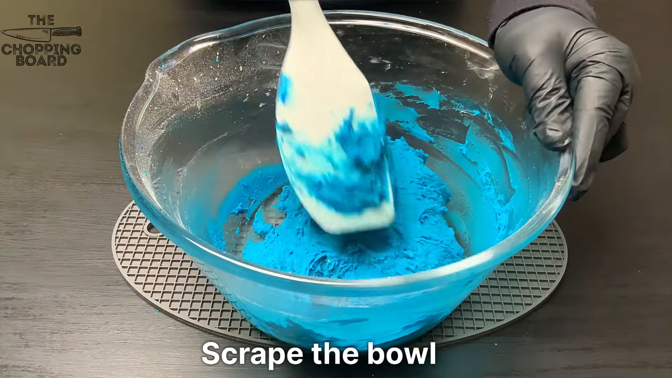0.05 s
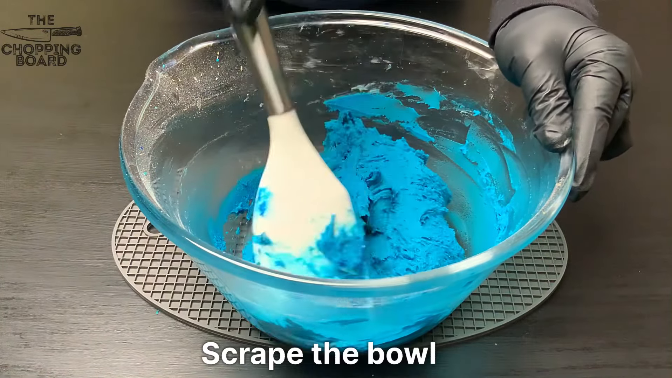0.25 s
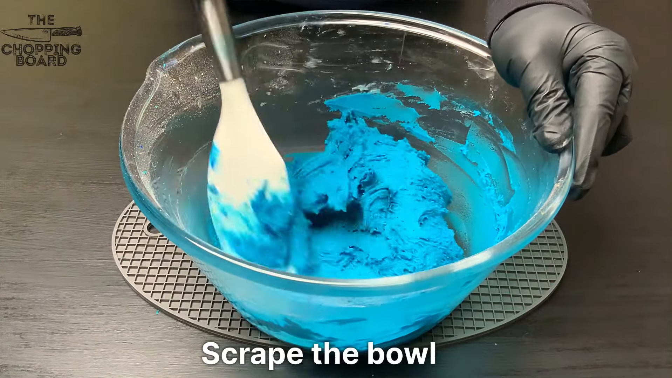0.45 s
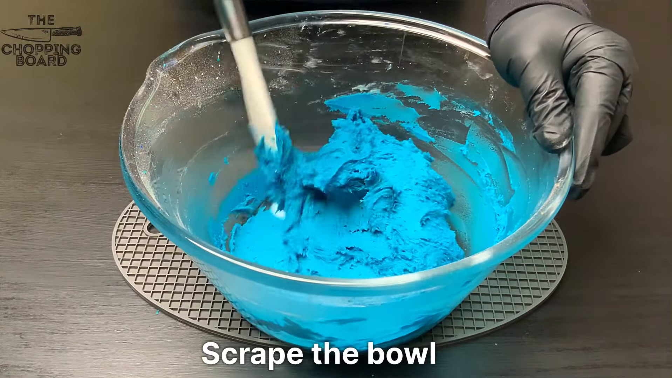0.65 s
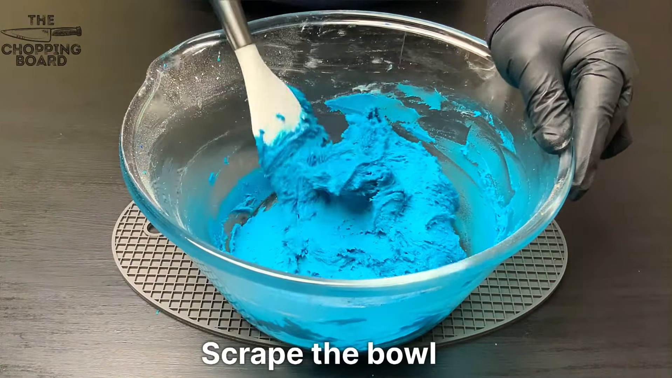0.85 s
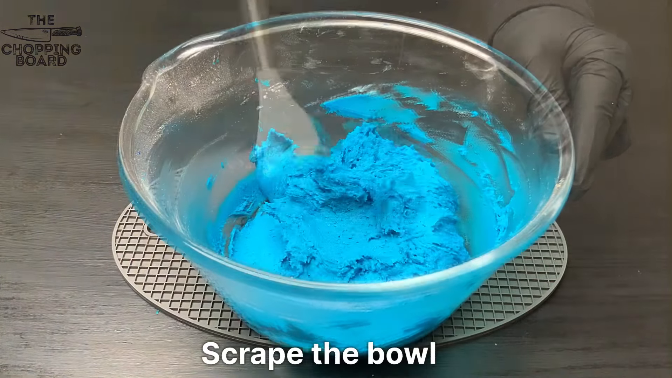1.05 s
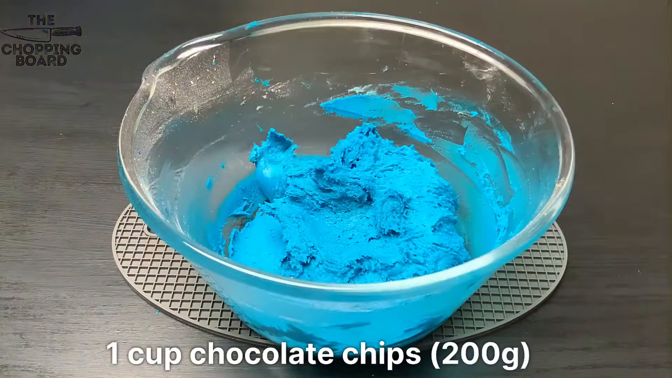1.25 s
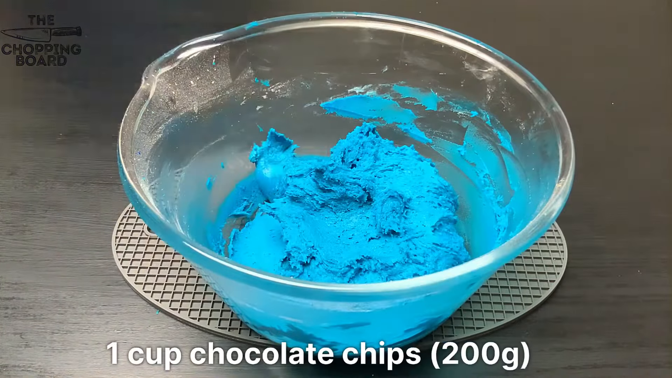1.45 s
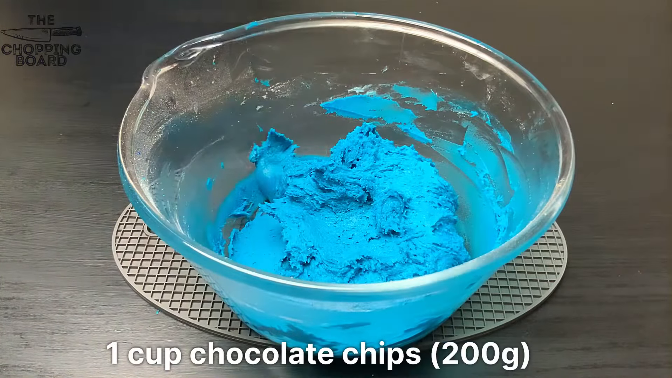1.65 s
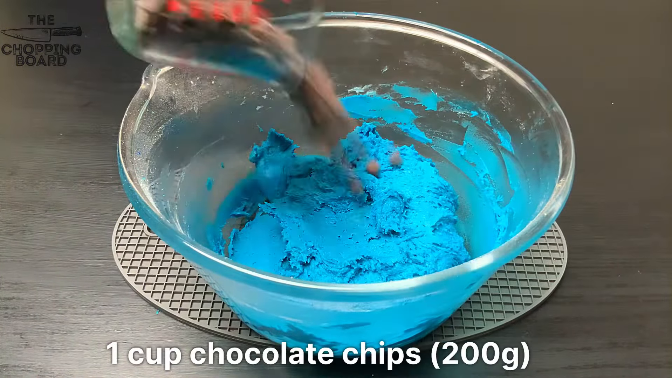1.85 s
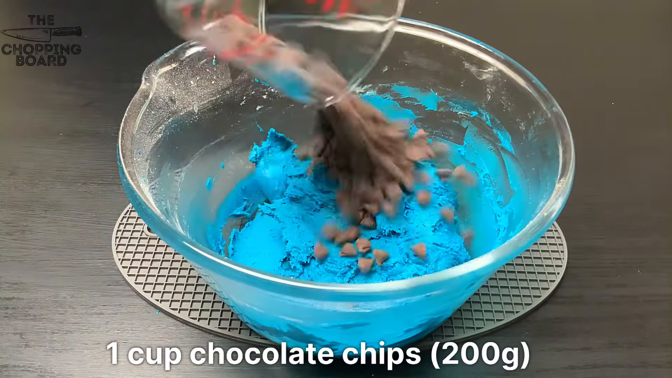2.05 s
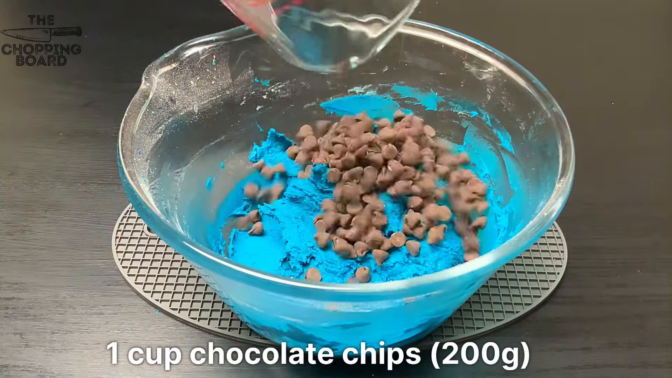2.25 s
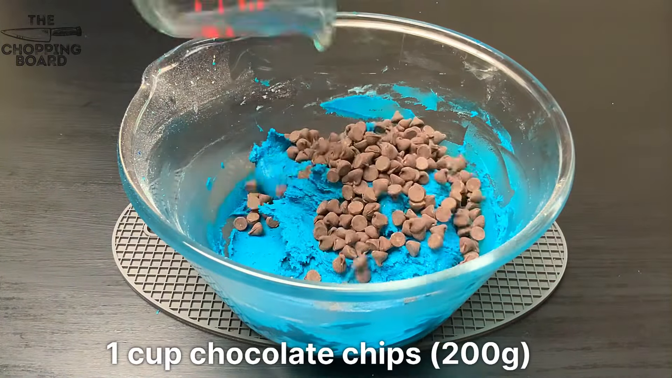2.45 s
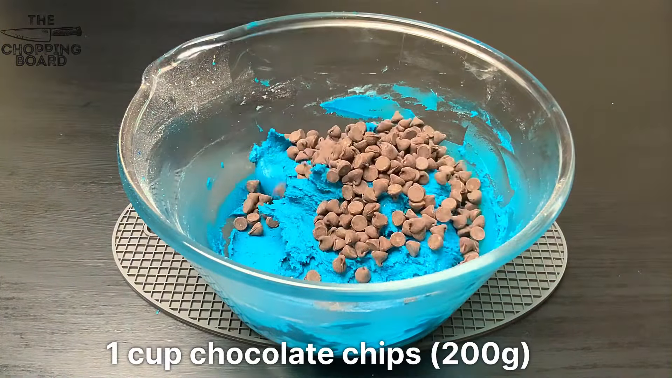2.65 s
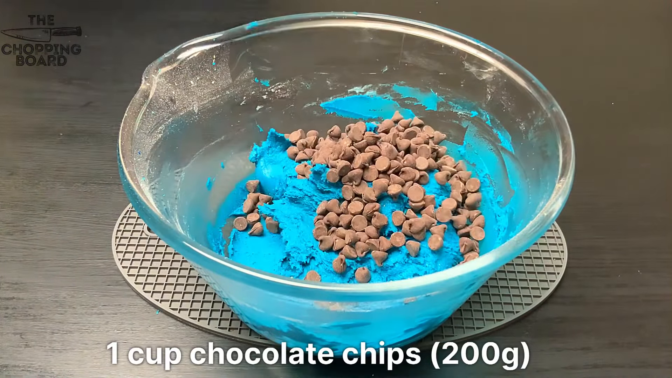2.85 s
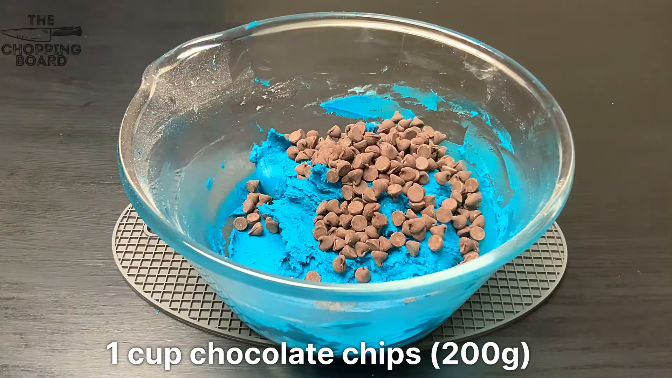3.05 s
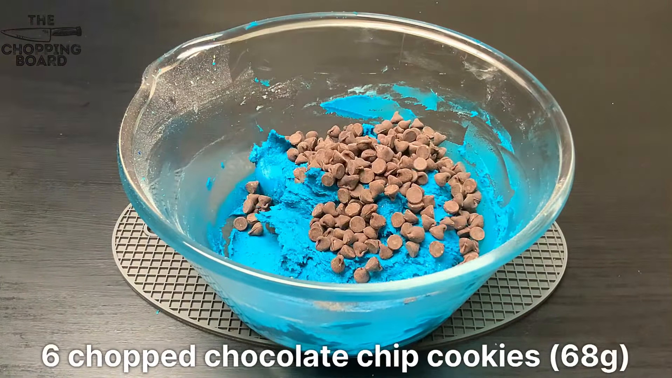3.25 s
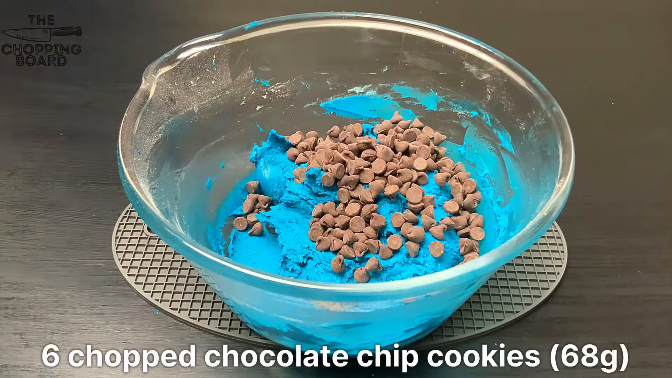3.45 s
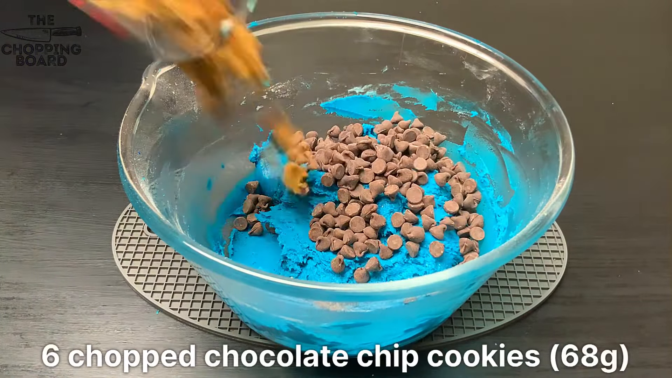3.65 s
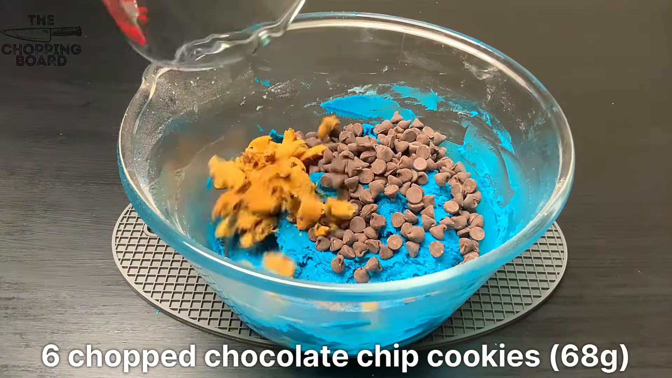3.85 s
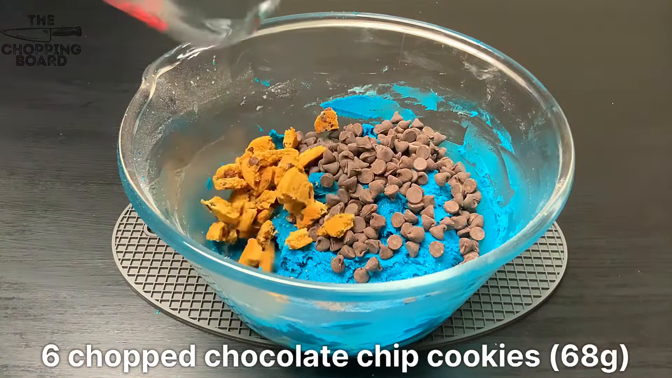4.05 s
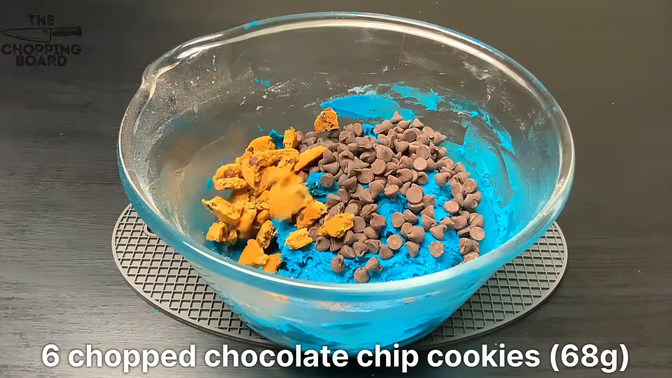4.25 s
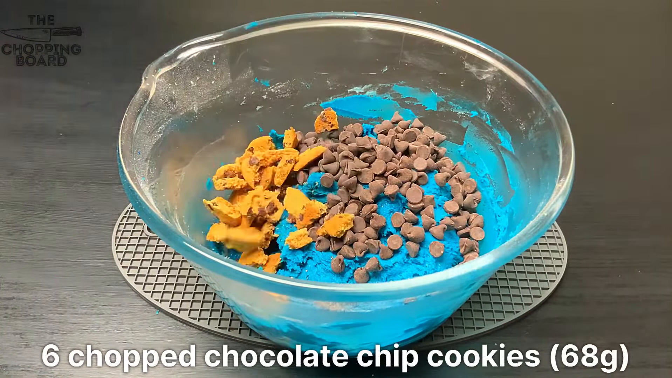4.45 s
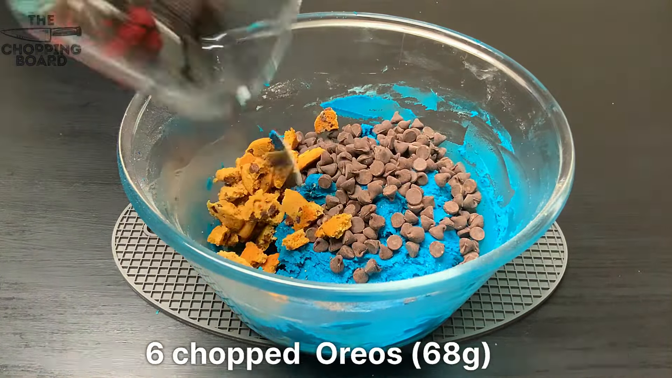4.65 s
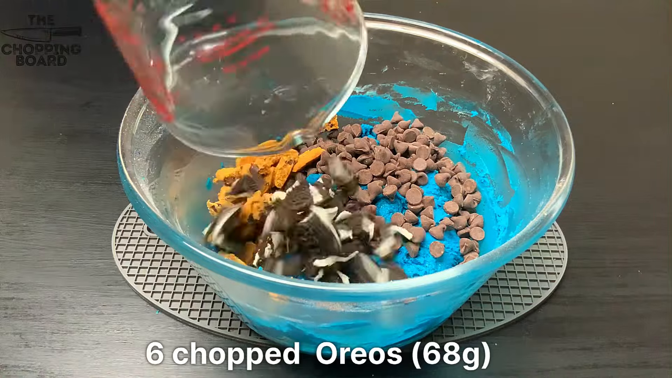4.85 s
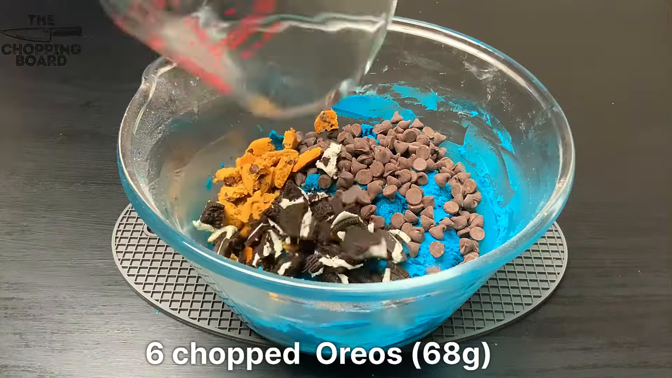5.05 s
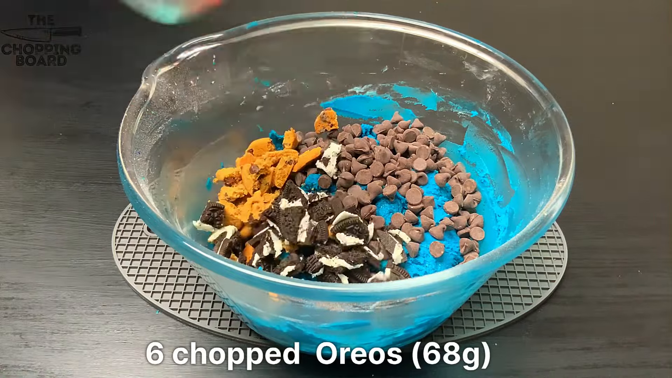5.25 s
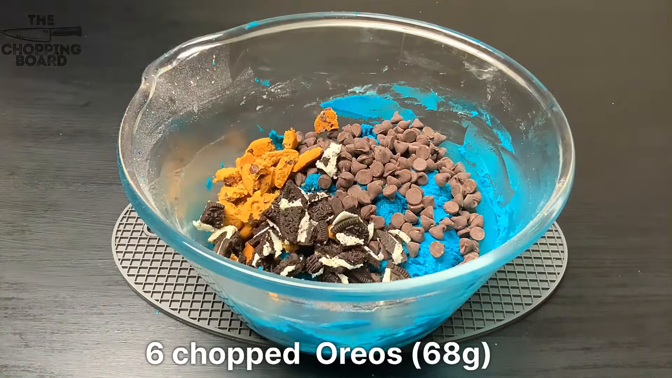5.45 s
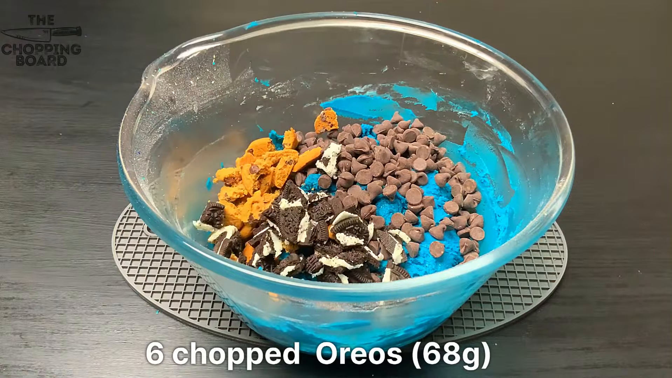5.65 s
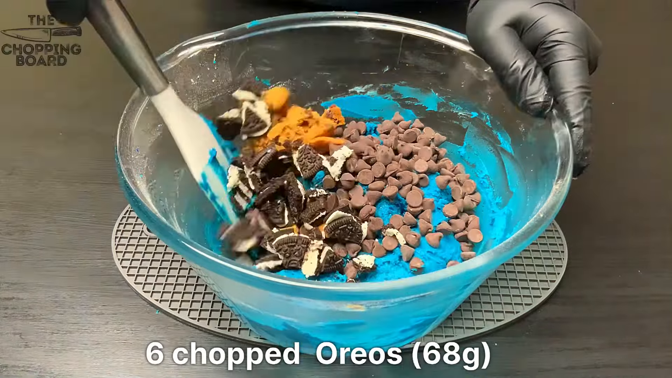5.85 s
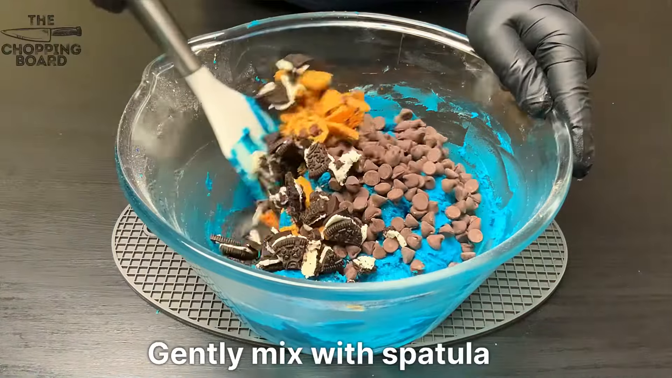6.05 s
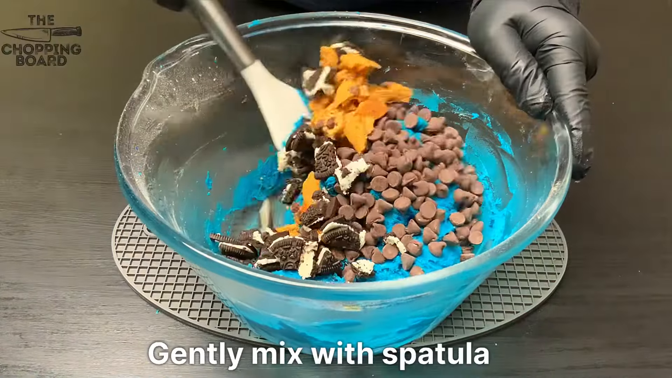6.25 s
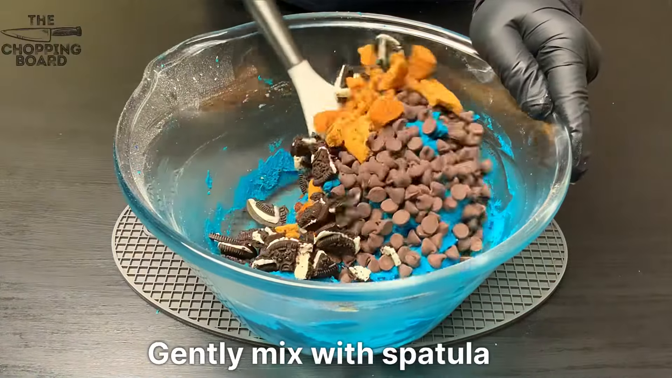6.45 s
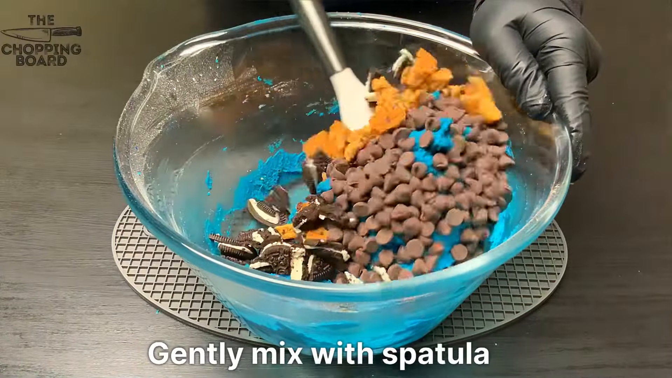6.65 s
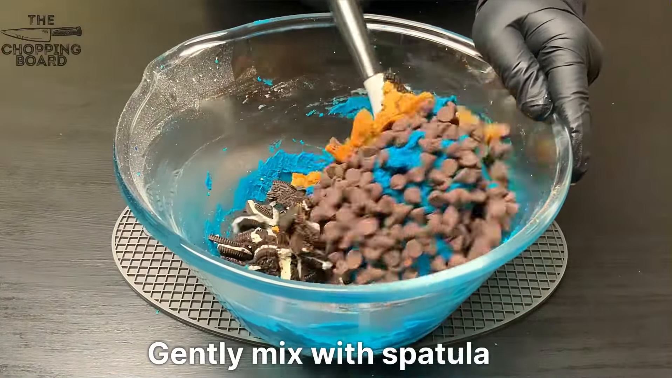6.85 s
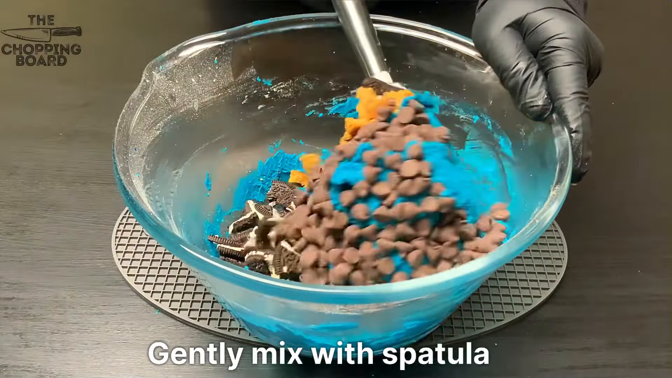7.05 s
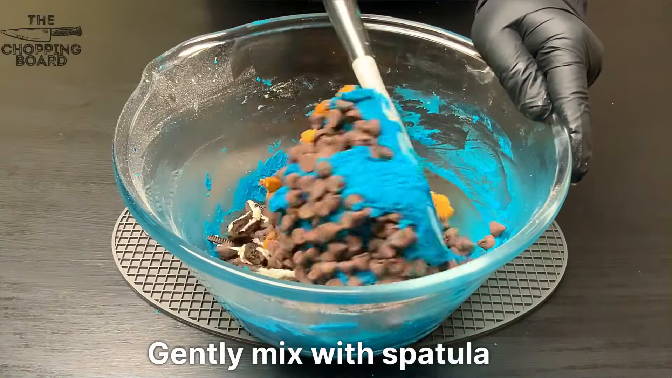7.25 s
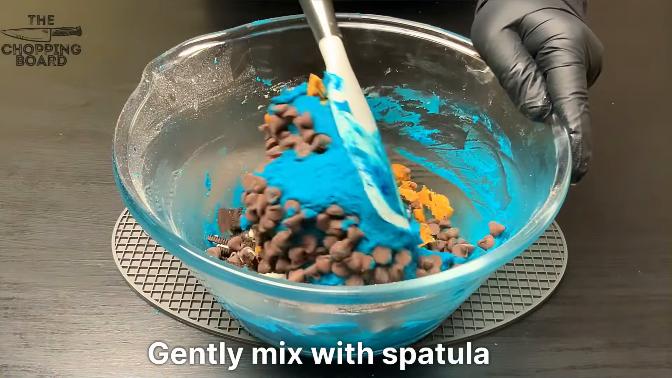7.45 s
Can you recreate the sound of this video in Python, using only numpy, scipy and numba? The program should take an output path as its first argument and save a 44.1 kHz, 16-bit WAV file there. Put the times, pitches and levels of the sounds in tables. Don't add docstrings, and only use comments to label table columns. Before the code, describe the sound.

In a quiet kitchen, a spatula faintly scrapes sticky dough in a glass bowl, clinks its steel handle on the rim and scrapes firmly before an abrupt cut. Chips tick in a glass jug and pour with a bright long rattle. Two short pours of cookie pieces follow, one thuddy, one sharper. Two more clinks, then crunchy, squelching folding. Close stereo microphones, slight room.

```python
import sys
import numpy as np
from scipy import signal
from scipy.fft import rfft, irfft, next_fast_len
from scipy.io import wavfile
from scipy.ndimage import uniform_filter1d
from numba import njit

SR = 44100
rng = np.random.default_rng(int(sys.argv[2]) if len(sys.argv) > 2 else 0)


def put_to_file(sound):
    columns = np.atleast_2d(sound).T
    safe = np.clip(columns, -1, 1)
    whole_steps = np.round(safe * 32767)
    wavfile.write(sys.argv[1], SR, whole_steps.astype(np.int16))


def how_loud(loudness_db):
    steps = np.asarray(loudness_db, float) / 20
    return 10 ** steps


N = 331191
TIME = np.arange(N) / SR
FAST = next_fast_len(N)
HZ = np.fft.rfftfreq(FAST, 1 / SR)
CUT_S = 1.194


def curve(tables, share_db=0., follows=0.92):
    out = np.full(N, -150.)
    for table, share in zip(tables, np.broadcast_to(share_db, len(tables))):
        s, value = np.transpose(table)
        level = share + follows * (np.interp(TIME, s, value) + 45) - 45
        out = np.where((TIME >= s[0]) & (TIME <= s[-1]), level, out)
    return out


def swells(s, db, rise_s, fall_s):
    coarse = TIME[::44]
    late = coarse[:, None] - s
    level = db - 30 * np.maximum(-late / rise_s, late / fall_s)
    return np.interp(TIME, coarse, np.max(level, axis=1))


def patches(rate, spread):
    hold = int(SR / rate)
    values = np.repeat(rng.standard_normal(N // hold + 1), hold)
    return spread * uniform_filter1d(values, hold // 2)[:N]


def shower(level_db, rate, spread_db):
    chance = rng.random((int(rate * N / SR), 2))
    s = chance[:, 0] * (N - 1) / SR
    db = level_db[(s * SR).astype(int)] - spread_db * np.log(chance[:, 1] + 0.02)
    audible = db > -125
    return s[audible], db[audible]


def colour(x, points, phase=0.):
    hz, db = np.transpose(points)
    gain = how_loud(np.interp(np.log(HZ + 1), np.log(hz), db))
    return irfft(rfft(x, FAST) * gain * np.exp(1j * phase), FAST)[:N]


def weigh(modes, points):
    hz, db = np.transpose(points)
    return [(f, mode_db + np.interp(np.log(f), np.log(hz), db), t60) for f, mode_db, t60 in modes]


def dry_body(lo_hz, hi_hz, cycles, count):
    return [(hz, -10 * np.log10(count), cycles / hz) for hz in np.geomspace(lo_hz, hi_hz, count)]


@njit
def add(out, place, size, r, w):
    a, b = 2 * r * np.cos(w), r * r
    i, e = 0, 0
    y1, y2, x1, x2 = 0., 0., 0., 0.
    while i < len(out):
        x = 0.
        while e < len(place) and place[e] <= i:
            x, e = x + size[e], e + 1
        y = .5 * (x - x2) + a * y1 - b * y2
        out[i] += y
        i, y1, y2, x1, x2 = i + 1, y, y1, x, x1
        if abs(y1) + abs(y2) + abs(x1) + abs(x2) < 1e-7:
            i = place[e] if e < len(place) else len(out)


def ring(modes, s, db, tilt_db=0., scatter_db=5.0, centre_hz=None, octaves=.6):
    place = (np.asarray(s) * SR).astype(np.int64)
    order = np.argsort(place)
    draws = np.random.default_rng(rng.integers(2 ** 20))
    chance = draws.standard_normal((len(place), 2, len(modes)))
    hz, mode_db, t60 = np.transpose(modes)
    gain_db = mode_db + np.reshape(tilt_db, (-1, 1)) * np.log2(hz / 3000)
    if centre_hz is not None:
        distance = np.log2(hz / np.reshape(centre_hz, (-1, 1))) / octaves
        gain_db = gain_db - np.minimum(6 * distance ** 2, 30)
    even = how_loud(gain_db)
    size = even * how_loud(scatter_db * chance[:, 0]) * np.sign(chance[:, 1])
    scale = how_loud(db) * np.linalg.norm(even, axis=-1) / np.linalg.norm(size, axis=1)
    size = (size * scale[:, None])[order].T.copy()
    out = np.zeros(N)
    for k in range(len(modes)):
        decay = np.exp(-np.log(1000) / (max(t60[k], 1e-4) * SR))
        add(out, place[order], size[k], decay, 2 * np.pi * hz[k] / SR)
    return out


# f/Hz, level/dB per Hz
KITCHEN = [(12, -34), (20, -4), (45, 2), (65, -18), (123, -1), (154, -25), (235, -16.5), (377, -26),
           (410, -19.5), (542, -28), (590, -19), (759, -25), (1000, -33), (1500, -46.5), (2460, -51.5),
           (16000, -43)]
# f/Hz, width/Hz, level/dB
HUMS = [(132, 26, -70), (415, 330, -79), (592, 13, -82.5)]
# t/s, level/dB, rise/s and fall/s per 30 dB
RUSTLE = [(1.2, -76.5, 0.009, 0.1), (1.337, -68.5, 0.033, 0.13), (1.521, -63.5, 0.014, .01),
          (2.618, -70, 0.14, 0.14), (2.694, -61.5, 0.0057, 0.076), (2.939, -72, 0.51, .22),
          (3.209, -69.5, .13, 0.003), (4.008, -83, 0.0097, 0.28), (4.27, -70, 0.19, 0.24),
          (4.526, -84.5, .2, 0.038), (5.122, -65.5, 0.026, 0.43), (5.348, -78, 0.19, .26),
          (5.84, -69, 0.79, 0.032)]
# t/s, level/dB
BUMPS = [(0.1, -80), (0.25, -58), (0.44, -55), (0.9, -45.5), (1.13, -48), (1.3, -64), (1.989, -50),
         (2.3, -50), (3.35, -72), (3.79, -47), (4.83, -51.5), (5.902, -45.5), (6.23, -46), (6.48, -51),
         (7.05, -49)]


def kitchen():
    def unit(x):
        return x / np.std(x)

    def noise(points):
        return unit(colour(rng.standard_normal(N), points))

    floor = how_loud(-62.5) * noise(KITCHEN)
    hums = 0
    for hz, width, db in HUMS:
        resonance = signal.iirpeak(hz, hz / width, SR)
        hums = hums + how_loud(db) * unit(signal.lfilter(*resonance, rng.standard_normal(N)))
    rumble = noise([(12, -20.5), (28, -6.0), (58, -4.5), (88, -10.5), (125, -3.0), (200, -15.0), (400, -43.0)])
    rustle = noise([(600, -30.0), (1500, -1.5), (6000, -4.5), (11000, -7.5), (16000, -5.5)])
    bumps = swells(*np.transpose(BUMPS), rise_s=0.29, fall_s=0.19)
    strokes = curve(STROKES, np.transpose(STROKE_SHARES)[4])
    rest_db = -66
    rumble_db = np.maximum(np.maximum(bumps, strokes), rest_db) - 4.5 + patches(13, 2.5)
    rustle_db = swells(*np.transpose(RUSTLE)) + 3.0
    return floor + hums + how_loud(rumble_db) * rumble + how_loud(rustle_db) * rustle


# f/Hz, level/dB, t60/s
BOWL = [(434, -12, 0.15), (480.5, -12, 0.25), (1056.4, -16, 0.2), (1453, -8.5, 0.044), (1619, -11.5, 0.06),
        (1803, -10, 0.11), (1866, -8, 0.12), (2030, -14.5, 0.05), (2720, -10.5, 0.085), (2774, -6, 0.1),
        (2812, -5.5, 0.1), (3540, -25.5, 0.05), (3876, -8, 0.099), (3977, -7, 0.051), (4620, -7.5, 0.077),
        (4752, -8.5, 0.09), (5080, -8.5, 0.045), (5440, -11.5, 0.067), (5556, -10, 0.092),
        (5976, -11.5, 0.08), (6770, -8.5, 0.035), (7100, -16, 0.01), (8170, -13.5, .05),
        (8700, -12.5, 0.023), (9630, -5.5, 0.04), (10200, -10, 0.043), (10800, -8, 0.029),
        (12100, -8.5, 0.037), (13700, -13.5, 0.046)]
# t/s, level/dB
PEEL = [
    (0.837, -62),
    (0.841, -50.5),
    (0.845, -46),
    (0.857, -66),
]
# t/s, level/dB
STROKES = [
    [(0.0, -87.5), (0.298, -85.5), (0.454, -77.5), (0.744, -72.5), (0.835, -76.5)],
    [(0.94, -41.5), (0.98, -53), (1.122, -47), (1.18, -60), (1.195, -59)],
    [(5.92, -72), (6.034, -57.5), (6.114, -62.5), (6.19, -65), (6.304, -57), (6.42, -62.5)],
    [(6.42, -63.5), (6.654, -57), (6.782, -53.5), (6.866, -52.5), (7.08, -57.5), (7.164, -53),
     (7.368, -59.5), (7.51, -63.5)],
]
# crackle/dB, scrape/dB, squelch/dB, drag on glass/dB, counter/dB
STROKE_SHARES = [
    (6.5, 0.5, -1.5, -15.5, 3),
    (-14, -1.5, -5, 3.5, -5.5),
    (-2.5, 3.5, -4, 3, 4),
    (-3, 7, -5.5, -22, -1),
]


def stirs():
    sticky, scraping, squelching, dragging = (curve(STROKES, share) for share in np.transpose(STROKE_SHARES)[:4])
    peeling = np.maximum(sticky, curve([PEEL])) + 4 + patches(45, 3.1)
    crackle = ring(dry_body(10000.0, 15500., 12.0, count=6), *shower(peeling, 3000, 2.8))
    s, db = shower(scraping - 2 + patches(32, 2.9), 1400, 4.1)
    pitch = np.clip(patches(25, 0.35), -.45, 1)
    hz = 4000 * 2 ** pitch[(s * SR).astype(int)]
    scrape = ring(dry_body(1000., 9000., 8.7, count=10), s, db, centre_hz=hz, octaves=0.92)
    grains = shower(dragging - 13, 300, 1.2)
    drag = ring(BOWL, *grains, scatter_db=-2.5, centre_hz=4200., octaves=1.5)
    grains = shower(squelching - 10 + patches(60, 3.5), 900, 3.9)
    squelch = ring(dry_body(290.0, 1400.0, 13.0, count=9), *grains)
    return crackle + scrape + drag + squelch


# t/s, peak level/dB, centre f/Hz
DOUGH_SNAPS = [(0.083, -42, 14400), (0.2493, -48, 13100), (0.365, -44, 14600), (0.4165, -73, 14530),
               (0.841, -52, 12000), (1.0385, -50, 3950), (1.09, -33, 4200), (6.0364, -55, 1970),
               (6.059, -33, 3070), (6.072, -35, 1450), (6.093, -34, 1500), (6.266, -39, 5590),
               (6.3476, -32, 5500), (6.426, -29, 5240), (6.4564, -39, 6400), (7.423, -33, 5340),
               (7.4267, -27, 2800)]
# t/s, peak level/dB, centre f/Hz
DROP_SNAPS = [(2.296, -15, 6960), (2.3784, -18, 7100), (2.413, -18.5, 12900), (2.4836, -33, 6750),
              (2.5234, -41, 12000), (2.549, -25, 10460), (2.586, -38, 12200), (2.696, -37, 5500),
              (2.6949, -36, 11000), (3.624, -44, 9160), (3.6596, -42, 9800), (3.704, -27, 10900),
              (3.7065, -23.5, 9800), (3.7188, -18.5, 12100), (3.7844, -32, 10900), (3.796, -42, 10900),
              (4.015, -43, 10800), (4.786, -30.5, 9340), (4.8096, -13, 14700), (4.8502, -17, 14800),
              (4.9585, -33.5, 11920), (4.993, -31.5, 13400), (5.1221, -27.5, 13080), (5.1228, -36, 5500),
              (5.133, -41, 5340), (5.185, -44, 4980)]
# t/s, peak level/dB, centre f/Hz
FOLD_SNAPS = [(6.5701, -39, 4830), (6.5895, -50, 10900), (6.641, -43, 5100), (6.6662, -27.5, 5340),
              (6.6843, -23.5, 12000), (6.7402, -44, 5640), (6.7751, -50, 13000), (6.7892, -27, 8100),
              (6.8455, -42, 13300), (6.862, -21.5, 8200), (6.9136, -19, 11400), (6.947, -28, 8240),
              (6.978, -33, 9400), (7.023, -24.5, 12400), (7.037, -27, 9710), (7.072, -20, 12100),
              (7.09, -23, 9300), (7.1363, -40.5, 14600), (7.1602, -36, 6650), (7.199, -29, 10600),
              (7.2235, -19, 11400), (7.234, -24, 10500), (7.2735, -31, 10600), (7.284, -30.5, 6900),
              (7.291, -30, 9000), (7.3913, -45, 10800), (6.69, -31, 11000)]


def snaps():
    s, db, hz = np.transpose(DOUGH_SNAPS + DROP_SNAPS + FOLD_SNAPS)
    late = np.arange(5)[:, None] * .0022 * rng.random((5, len(s)))
    fade_db = 1100 * late + 13.0 * (late > 0)
    times, levels = np.ravel(s + late), np.ravel(db - fade_db + 12)
    body = dry_body(1700.0, 15500., 8.9, count=16)
    return ring(body, times, levels, scatter_db=2.0, centre_hz=np.tile(hz, 5), octaves=0.4)


# t/s, peak level/dB, ring against crack/dB, jolt against crack/dB
CLINKS = [
    (0.87, -9.5, -9.5, -27),
    (5.868, -10, -21, -30),
    (6.198, -19, -14.5, -19),
]
# f/Hz, level/dB
CRACK_COLOURS = [
    [(1300, -1.5), (1900, 4), (3300, -4.5), (4800, -1), (6200, 1.5), (8000, -6), (12000, 0.5), (15000, -8)],
    [(1300, -2), (2000, 2), (3300, 2), (4500, 10), (5800, 10), (7000, -8.5), (12000, 11.5), (15000, -2)],
    [(1300, -2), (1700, -0.5), (2200, -12), (2800, -16), (4000, -7), (5000, -19), (7000, -34), (15000, -34)],
]
# f/Hz, level/dB
RING_COLOURS = [
    [(450, -13), (1800, -5.5), (2800, 3), (3900, -1), (4750, -2.5), (5300, -7), (6050, 1.5), (12000, -12.5)],
    [(450, -9.5), (1900, -5), (2800, 7.5), (3900, 7.5), (4700, -19), (5400, 13.5), (6500, -23),
     (12000, -5.5)],
    [(450, -8), (1400, -2.5), (1900, -8.5), (2800, 3), (3900, -9.5), (4750, -23), (6000, -31), (12000, -36)],
]


def clinks():
    out = 0
    for (s, db, ring_db, jolt_db), crack, tone in zip(CLINKS, CRACK_COLOURS, RING_COLOURS):
        late = np.arange(8) * .00045 * (0.53 + 1.0 * rng.random(8))
        steel = weigh(dry_body(1300., 15000., 22., count=24), crack)
        out = out + ring(steel, s + late, db - 2200 * late - 2.5, scatter_db=8.0)
        mat = dry_body(300., 1000., 31.0, count=5)
        out = out + ring(mat, [s], [db + jolt_db], scatter_db=-2.5)
        out = out + ring(weigh(BOWL, tone), [s + 0.00056], [db + ring_db], scatter_db=1.7)
    return out


# f/Hz, level/dB, t60/s
JUG = [(1548, -5, 0.084), (2450, -17, 0.075), (3887, -4.5, 0.027), (3900, -5.5, 0.11), (4320, -6, 0.06),
       (4444, -9, 0.07), (6780, -11.5, 0.013), (9000, -16.5, 0.096), (9480, -12, 0.038),
       (9453, -10.5, 0.045), (10900, -19.5, 0.066), (10540, -14, 0.028), (12040, -11, 0.03),
       (12200, -15, 0.045), (13300, -25, .08), (14600, -21, .06)]
# t/s, peak level/dB, hardness/dB per octave
JUG_TICKS = [(1.527, -34.5, 5), (1.6646, -50, -1), (1.687, -33.5, 2.5), (1.695, -37, 5), (1.713, -26, 7.5),
             (1.724, -25, 7.5), (1.735, -25.5, 7.5), (1.749, -29, 2), (1.7942, -24.5, 5.5), (1.826, -31, 4),
             (1.8655, -27.5, 0), (3.482, -40, -15), (3.4996, -46.5, 3), (3.5592, -60, -17),
             (3.6254, -45.5, 2), (4.564, -44, 6), (4.654, -47, 10), (4.7044, -38, -0.5), (4.722, -29.5, 2),
             (4.742, -27, 0.5), (4.7866, -39, 4.5), (3.27, -66, 6.5), (1.76, -33, 1)]
# t/s, peak level/dB, hardness/dB per octave
LIP_RATTLE = [(1.8816, -21, 1.5), (1.8904, -28, 8.5), (1.8974, -23, 7), (1.9064, -26.5, 4),
              (1.9164, -23, 10), (1.9224, -26.5, 8.5), (1.9304, -27.5, 5.5), (1.9414, -25, 2.5),
              (1.9514, -29, 3), (1.9674, -25.5, 0), (1.9774, -31, -1.5), (1.9894, -21.5, 3),
              (1.9994, -27, 5), (2.0094, -21, 2), (2.0214, -23.5, 3.5), (2.0344, -27, 1)]
# t/s, peak level/dB, hardness/dB per octave, ring centre f/Hz
BOWL_TICKS = [(2.0519, -16.5, -2, 5170), (2.062, -22, 4.5, 7860), (2.075, -21, -2.5, 5158),
              (2.094, -15.5, 3.5, 5370), (2.108, -24.5, 3, 4800), (2.1301, -18, 6.5, 9300),
              (2.143, -19, 6.5, 4200), (2.156, -19, 2, 7000), (2.172, -22, 0, 3020),
              (2.1837, -20.5, 12, 5670), (2.202, -20.5, 3, 6000), (2.2428, -21.5, 5.5, 6900),
              (2.25, -28.5, 5.5, 9000), (2.2957, -27.5, 5.5, 5500), (2.3781, -30, 1, 4860),
              (2.4643, -44.5, 13, 4800), (2.058, -35, 0, 480), (2.585, -51, 11, 4700),
              (3.732, -32, -7, 3890), (4.899, -30.5, 2, 2500)]
# t/s, peak level/dB, hardness/dB per octave, ring centre f/Hz
FOLD_TICKS = [(6.268, -39.5, 1, 3400), (6.3485, -39, -10.5, 3600), (6.4532, -34.5, -8, 3800),
              (6.57, -40.5, -13.5, 3740), (6.639, -43, -4, 2800), (6.663, -37.5, -3, 3800),
              (6.7427, -43, 0, 2800), (6.7895, -40, 10.5, 5000), (6.861, -37.5, 5.5, 5000),
              (6.9093, -43.5, 13.5, 4200), (6.9464, -46, 14, 3900), (7.1588, -49, 12, 3900),
              (7.286, -37.5, 3, 4700), (7.4249, -39, 1, 3170)]


def ticks():
    dull = weigh(dry_body(1390.0, 15500.0, 35.0, count=12), [(1400, -10.0), (3500, 0.0), (12000, 0.5)])
    jug = how_loud(-7.5) * ring(JUG + dull, *np.transpose(JUG_TICKS), scatter_db=4.5)

    s, db, tilt_db = np.transpose(LIP_RATTLE)
    late = 0.006 * rng.random((len(s), 4))
    times = np.ravel(s[:, None] + late)
    clump = weigh(JUG, [(1500, -12), (4000, -3.5)]) + dry_body(3500., 15500., 18., count=14)
    lip = ring(clump, times, np.repeat(db - 17.0, 4), np.repeat(tilt_db, 4), scatter_db=7.5)

    s, db, tilt_db, hz = np.repeat(BOWL_TICKS + FOLD_TICKS, 3, axis=0).T
    bounce = np.ravel(np.arange(3) * .003 * rng.random((len(s) // 3, 3)))
    s, db = s + bounce, db - 4.5 - 600 * bounce
    wall = BOWL + dry_body(2100.0, 13000.0, 25., count=12)
    bowl = how_loud(-7.5) * ring(wall, s, db, tilt_db, scatter_db=3., centre_hz=hz, octaves=0.56)
    return jug + lip + bowl


def settle(rows, share_db, fall_s):
    s, db = np.transpose([row[:2] for row in rows])
    shaking = swells(s, 0., .003, .25) > -30
    level = swells(s + 0.0034, db + share_db, .006, fall_s)
    return np.where(shaking, np.maximum(level, -110), -150.)


# t/s, level/dB
FLOWS = [
    [(1.65, -63.5), (1.86, -47.5), (1.91, -37.5), (2.04, -34), (2.1, -28.5), (2.124, -33), (2.15, -26.5),
     (2.27, -46.5), (2.6, -76)],
    [(3.6, -62), (3.692, -78), (3.704, -56.5), (3.746, -52.5), (3.78, -59), (3.896, -69.5), (3.96, -102)],
    [(4.67, -63), (4.76, -67.5), (4.826, -35.5), (4.874, -64.5), (4.914, -49.5), (5.0, -72), (5.06, -80)],
]
# brightness/dB per octave, bowl ring/dB, jug ring/dB, thud/dB
POUR_SHARES = [
    (11, -23.5, -15, -11),
    (5.5, -13.5, 2, 11),
    (8.5, -14, -2, 4),
]


def pours():
    body = dry_body(4050.0, 14600., 11.0, count=16)
    tilts_db, bowl_db, jug_db, thud_db = np.transpose(POUR_SHARES)
    grip_db = patches(70, 2.5)
    rattle = 0
    for flow, tilt_db in zip(FLOWS, tilts_db):
        grains = shower(curve([flow]) - 8 + grip_db, 1800, 1.4)
        rattle = rattle + ring(body, *grains, tilt_db, scatter_db=3.0)
    settling = settle(JUG_TICKS + BOWL_TICKS, share_db=-10, fall_s=0.058)
    rattle = rattle + ring(body, *shower(settling - 8, 1200, 4.0), 2.1)

    landing = np.maximum(curve(FLOWS, bowl_db), settle(BOWL_TICKS, share_db=-25.5, fall_s=0.11))
    grains = shower(landing - 3, 420, 3.0)
    bowl = ring(BOWL, *grains, scatter_db=5.5, centre_hz=5500.0, octaves=3.3)

    fall_s = 0.041
    leaving = np.roll(curve(FLOWS, jug_db), -int(fall_s * SR))
    sliding = np.maximum(leaving, settle(JUG_TICKS, share_db=-16.5, fall_s=0.18))
    jug = ring(JUG, *shower(sliding - 13, 300, 5.5), scatter_db=3.5)

    grains = shower(curve(FLOWS, thud_db, follows=0.81) - 6.5, 200, 4.0)
    thud = ring(dry_body(140.0, 1000.0, 6.1, count=8), *grains, tilt_db=1.5)
    return rattle + bowl + jug + thud


# f/Hz, early level/dB, late level/dB, late t60/s
ROOM = [(104, -15.5, -4.5, 0.056), (416, -1.5, 0.5, .4), (1500, -3.5, -9, 0.51), (3020, -9.5, -6.5, 0.28),
        (6000, -9.5, -5.5, 0.22), (9240, -7.5, -11.5, 0.34), (13400, -3.5, -16, 0.45)]


def room():
    t = np.arange(SR // 2) / SR
    answer = np.zeros((2, len(t)))
    answer[:, 0] = 1
    edges = [30] + [np.sqrt(a[0] * b[0]) for a, b in zip(ROOM, ROOM[1:])] + [18000]
    for k, (hz, early_db, late_db, t60) in enumerate(ROOM):
        band = signal.butter(2, edges[k:k + 2], "bandpass", fs=SR, output="sos")
        for db, decay, gap, alike in ((early_db, .03, .0008, .75), (late_db, t60, .006, .3)):
            shape = np.exp(-np.log(1000) * t / decay) * (1 - np.exp(-t / gap))
            own, shared = rng.standard_normal(answer.shape), rng.standard_normal(len(t))
            noise = np.sqrt(1 - alike) * own + np.sqrt(alike) * shared
            answer += how_loud(db) * signal.sosfilt(band, noise * shape / np.linalg.norm(shape))
    return answer


def scene():
    answer = room()
    close = snaps()
    near = clinks() + ticks() + pours() + stirs() + 0.14 * close
    later = np.where(TIME < CUT_S + .25, 0, near)
    heard = signal.fftconvolve((later + kitchen())[None], answer, axes=1)[:, :N]
    end = int((CUT_S + .01) * SR)
    fade = np.clip((CUT_S - TIME[:end]) / 0.0046, 0, 1)
    heard[:, :end] += fade * signal.fftconvolve(near[None, :end], answer, axes=1)[:, :end]
    return heard + 0.55 * close


# f/Hz, level/dB
PORT_COLOUR = [(60, 1), (270, -1.5), (420, 0), (900, 2.5), (1350, 2.5), (1750, 0.5), (3200, 0), (4500, 0.5)]
# f/Hz, phase ahead/rad
PORT_PHASE = [(0, 0), (220, .2), (480, .75), (650, 2.9), (740, 3.2), (820, 4.7), (1000, 5.1), (1160, 2.8),
              (1290, 1.7), (1460, 0), (1800, -.95), (2840, -6.3), (3880, -13.6), (5940, -25), (7490, -33.9),
              (10080, -47), (11200, -52.5), (13800, -64.4), (16000, -74.8)]
# f/Hz, level/dB
PORT_DB = [(28, 0.5), (60, 4.5), (200, 0), (1000, 2.5), (3000, 0), (5000, 3), (9000, -0.26)]


def ports(heard):
    left, right = [colour(port, PORT_COLOUR) for port in heard]
    left = colour(left, PORT_DB, np.interp(HZ, *np.transpose(PORT_PHASE)))
    return np.array([left, right])


def roll_off(x):
    return signal.sosfilt(signal.butter(12, 16850, fs=SR, output="sos"), x)


def record(dry):
    top = signal.ellip(8, .2, 50, 15900, fs=SR, output="sos")
    mix = signal.sosfilt(top, ports(dry))
    return roll_off(mix)


dry = scene()
out = record(dry)
put_to_file(out)
```